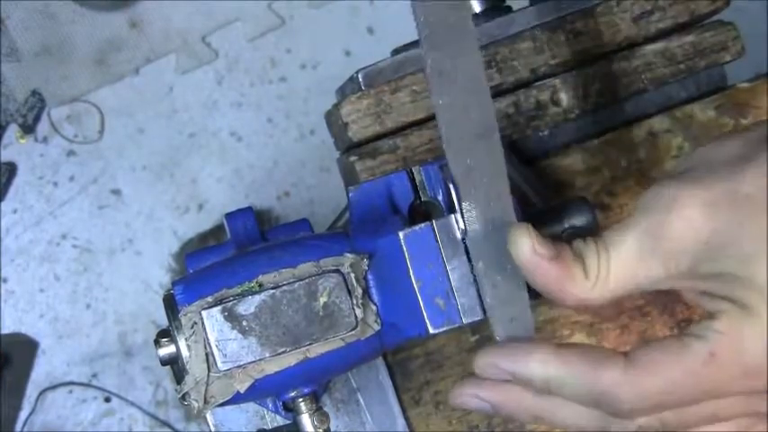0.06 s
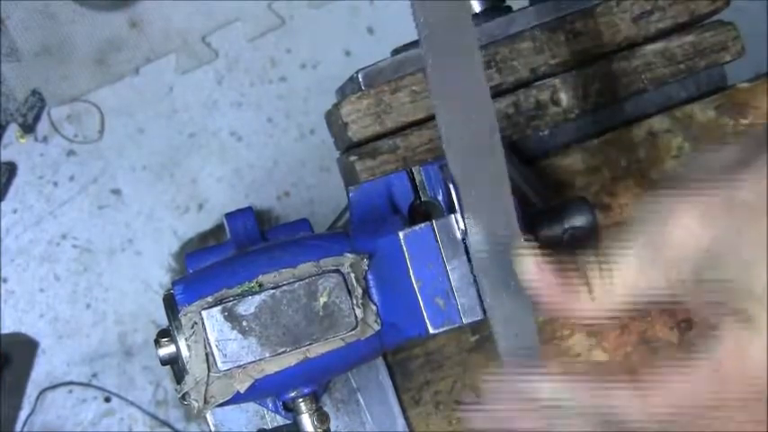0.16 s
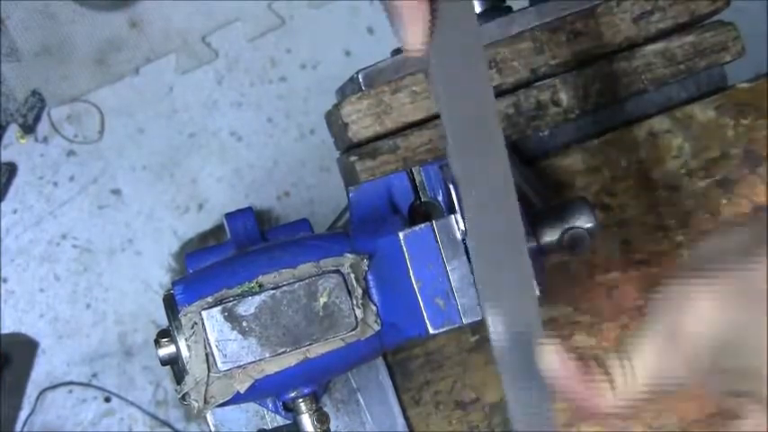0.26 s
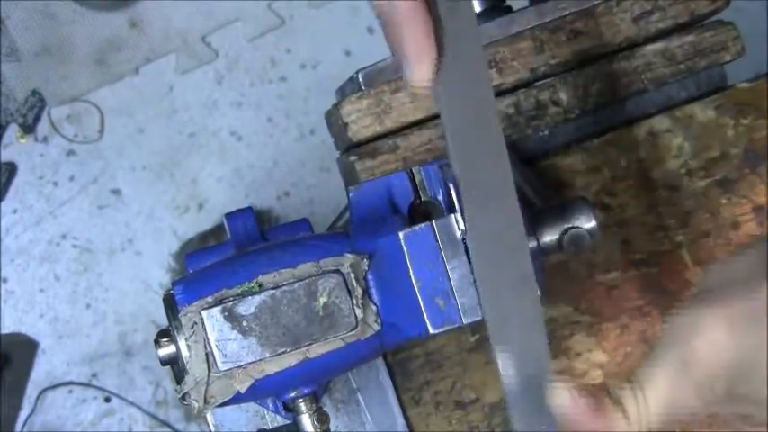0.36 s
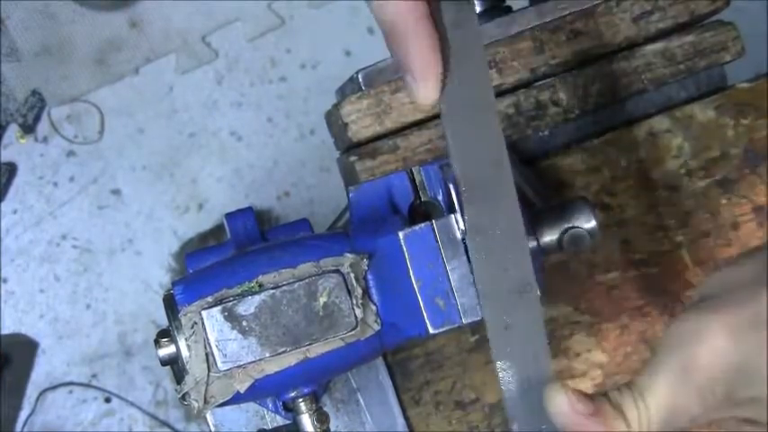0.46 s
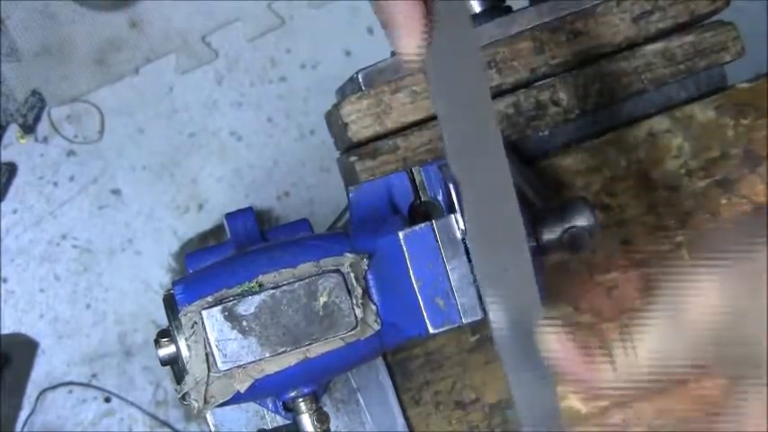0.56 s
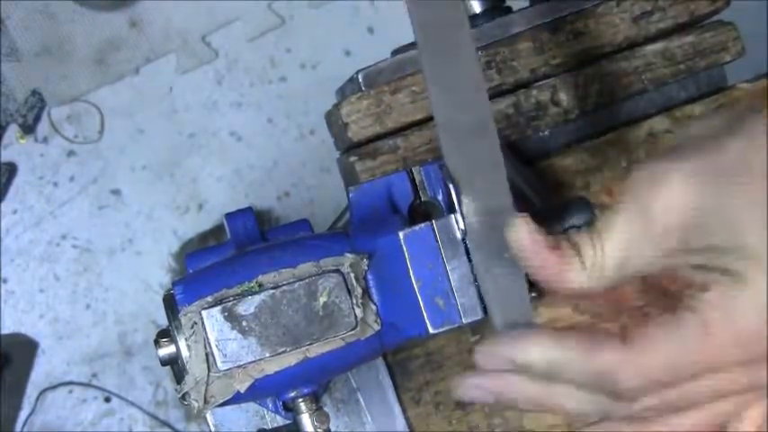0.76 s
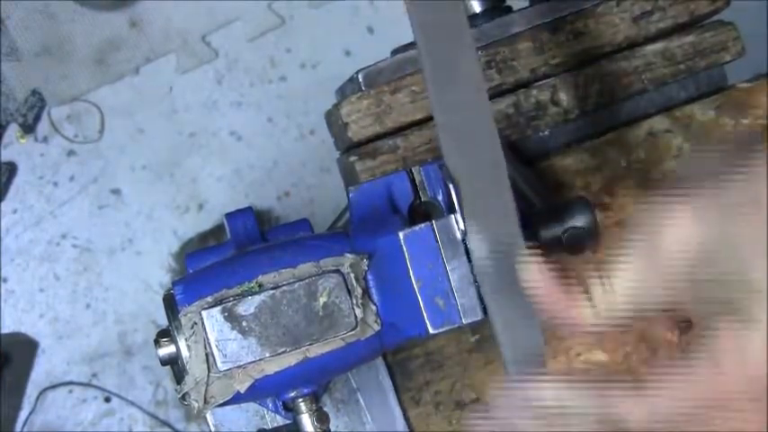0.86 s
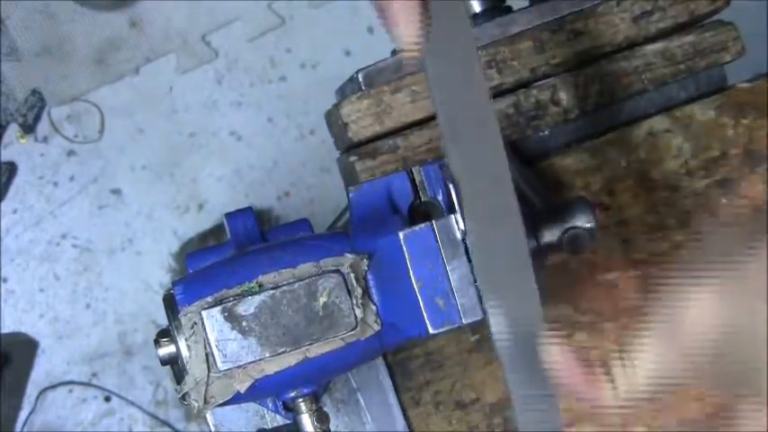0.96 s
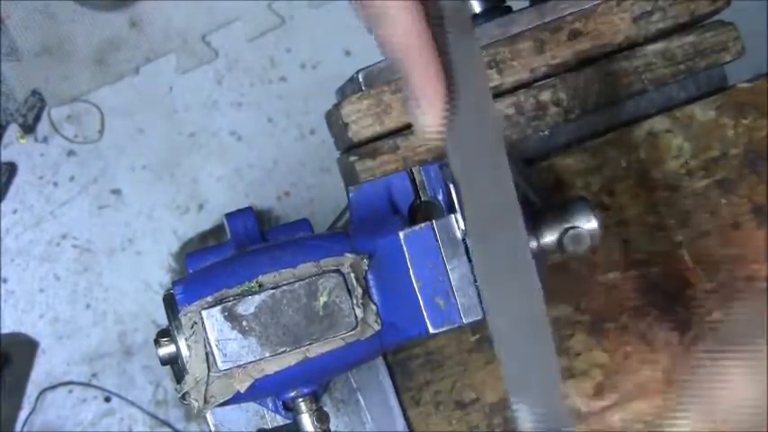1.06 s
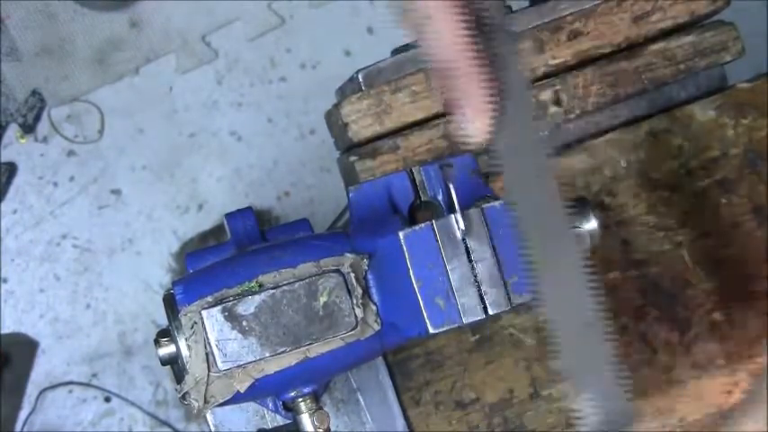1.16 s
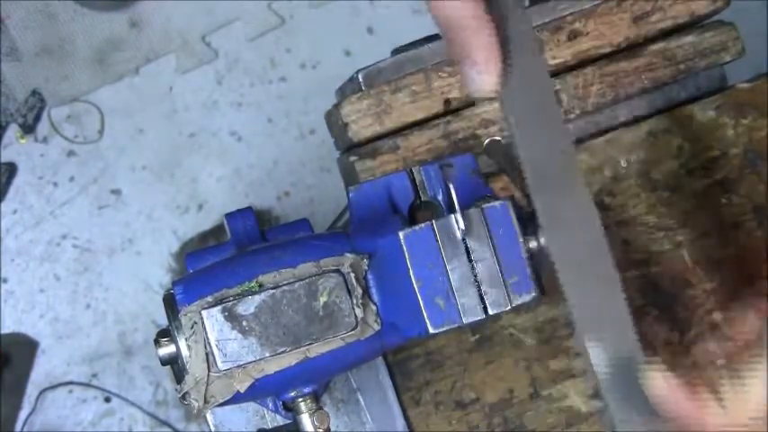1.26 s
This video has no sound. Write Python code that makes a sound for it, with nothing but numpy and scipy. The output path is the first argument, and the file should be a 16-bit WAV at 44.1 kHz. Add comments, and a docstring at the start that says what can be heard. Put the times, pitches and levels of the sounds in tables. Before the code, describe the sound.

A metal file scrapes thin steel sheet clamped in a vice. Two faint dull scuffs come before 0.15 s, then a gritty, ringing push from about 0.2 to 0.45 s. A louder, brighter draw back follows at 0.55-0.77 s, then a longer push at 0.86-1.17 s. Low vice and bench judder underlies the strokes. Close, dry small workshop, faint steady air and hum.

```python
"""In a small workshop with a low hum, a flat file works on thin steel sheet held in a bench vice.
After two light touches it is pushed across the edge, drawn back and pushed again.
Its teeth catch unevenly: trains of clicks mixed with gritty noise ring the sheet and the file.
Vice and bench judder as well, most on the push: low noise through a few resonances.
Room reflections, and in the top treble the stereo microphone, spread the filing left and right."""
import sys
import numpy as np
from scipy import signal
from scipy.fft import rfft, irfft
from scipy.io import wavfile
from scipy.ndimage import uniform_filter1d

SR = 44100
rng = np.random.default_rng(int(sys.argv[2]) if len(sys.argv) > 2 else 0)


def to_wav(sig):
    """Store sig (one row per channel, or 1-D mono) as 16-bit WAV at the path in sys.argv[1].

    Samples outside -1..1 are clipped; the rate is SR.
    """
    pcm = np.clip(np.atleast_2d(sig), -1, 1) * 32767
    pcm = np.round(pcm).astype(np.int16)
    wavfile.write(sys.argv[1], SR, pcm.T)  # frames by channels


N = 57330  # length in samples, 1.3 s


def undb(db):
    """Turn decibels into a plain gain."""
    return 10 ** (np.asarray(db) / 20)


def unit(x):
    """Scale to an average strength (rms) of 1."""
    return x / np.sqrt(np.mean(x ** 2))


def band(x, hz, width):
    """One resonance: lets through a narrow band, with gain 1 at its centre."""
    return signal.lfilter(*signal.iirpeak(hz, hz / width, fs=SR), x)


def cut(x, hz, kind, order=4):
    """Keep only what lies below ("low") or above ("high") a pitch."""
    return signal.sosfilt(signal.butter(order, hz, kind, fs=SR, output="sos"), x)


def colour(x, points):
    """Shape the tone through (Hz, dB) points with a filter that never sounds ahead of its input."""
    hz, db = np.array(points).T
    size = 2048
    grid = np.maximum(np.arange(size // 2 + 1) * SR / size, 1)
    log_gain = np.log(undb(np.interp(np.log(grid), np.log(hz), db)))
    # Folding the cepstrum forward in time gives the minimum-phase filter
    cepstrum = irfft(log_gain)
    cepstrum[1:size // 2] *= 2
    cepstrum[size // 2 + 1:] = 0
    response = irfft(np.exp(rfft(cepstrum)))
    return signal.fftconvolve(x, response)[:N]


def flutter(hz):
    """Smooth random wandering with a spread of 1, no faster than about the given pitch."""
    return unit(cut(rng.standard_normal(N), hz, "low", order=2))


# Tone of the workshop background.
# Each row: pitch in Hz, relative strength per Hz in dB.
BACKGROUND_COLOUR = [(18, -29), (30, -16), (153, -4), (296, -6), (505, -4), (1550, -12), (1670, -9.5),
                     (2050, -15.5), (2780, -20.5), (3000, -22), (7490, -29), (13100, -42)]
# How strongly left and right differ in the background.
# Each row: pitch in Hz, strength of the difference in dB.
BACKGROUND_SIDE = [(60, -15), (200, -8.5), (700, -15), (2100, -13), (7000, -8), (12700, 0)]
AIR_DB, HUM_HZ, HUM_DB = -45, 120, -55  # the air level is for the part shared by both sides


def background():
    """Steady workshop air, as coloured noise partly different left and right, and a pure low hum."""
    middle, side = (unit(colour(rng.standard_normal(N), BACKGROUND_COLOUR)) for _ in range(2))
    hum = undb(HUM_DB) * unit(np.sin(2 * np.pi * HUM_HZ * np.arange(N) / SR))
    left_right = colour(side, BACKGROUND_SIDE) * np.array([[1], [-1]])
    return undb(AIR_DB) * (middle + left_right) + hum


# Broad colour of scraping on the push, also used for the touches.
# Each row: pitch in Hz, relative strength per Hz in dB.
PUSH_COLOUR = [(180, -44.5), (300, -5), (425, -10), (538, 1.5), (583, -3), (693, -0.5), (838, -5.5),
               (936, -6.5), (1390, -12.5), (2200, -8), (5330, -21), (8290, -19), (9860, -25.5),
               (13100, -57)]
# Light touches of the file.
# Each row: start in seconds, level in dB before rise and fade, fade time (to 1/e) in seconds,
# centre pitch in Hz, width in Hz.
TOUCHES = [(0.027, -31.5, 0.02, 830, 1110), (0.117, -37.5, 0.0051, 2830, 2000)]
TOUCH_ATTACK_S, TOUCH_TOP_HZ = 0.0046, 3030


def touches():
    """Brief dull scuffs as the file settles on the edge: filtered noise that rises fast and fades."""
    t = np.arange(N) / SR
    out = 0
    for start, db, decay, hz, width in TOUCHES:
        scrape = colour(rng.standard_normal(N), PUSH_COLOUR)
        scuff = unit(cut(band(scrape, hz, width), TOUCH_TOP_HZ, "low"))
        age = np.maximum(t - start, 0)
        out = out + undb(db) * scuff * np.minimum(age / TOUCH_ATTACK_S, 1) * np.exp(-age / decay)
    return out


TOOTH_JITTER, TOOTH_SCATTER_DB = 0.16, 1.5  # unevenness in spacing (share of the rate) and in size
GRIT_DB, GRIT_SCATTER_DB = 2.5, 2.5  # grit compared with the clicks, and its own unevenness
CHATTER_HZ, CHATTER_DB = 255, 1.4  # the grip of the teeth flutters


def teeth(rate):
    """A click for each tooth that catches, uneven in spacing and size, with fine grit between."""
    phase = np.cumsum(rate * np.exp(TOOTH_JITTER * flutter(500))) / SR
    at = np.flatnonzero(np.diff(np.floor(phase)))  # one click per whole turn of the phase
    sizes = undb(TOOTH_SCATTER_DB * rng.standard_normal(N))
    clicks = np.zeros(N)
    clicks[at] = sizes[at] / np.sqrt(rate[at])
    grit = rng.standard_normal(N) * undb(GRIT_SCATTER_DB * rng.standard_normal(N))
    contact = unit(cut(clicks, 190, "high")) + undb(GRIT_DB) * unit(grit)
    return contact * undb(CHATTER_DB * flutter(CHATTER_HZ))


SPREAD_S, SPREAD_HZ = 0.003, 2028  # travel time of a bending wave at this pitch


def disperse(x):
    """Bending waves in steel carry the treble faster than the bass, which smears each click."""
    hz = np.arange(N // 2 + 1) * SR / N
    return irfft(rfft(x) * np.exp(-4j * np.pi * SPREAD_S * np.sqrt(SPREAD_HZ * hz)), N)


# Ring of the clamped sheet, before the broad colour is added.
# Each row: pitch in Hz, width in Hz, gain on the push in dB, gain on the draw in dB.
SHEET_MODES = [(540, 18, -4.5, -5), (683, 28, 0.5, -5.5), (724.6, 16, -0.5, 3), (841, 17, -6, -1),
               (960, 89, 0, -7), (1038, 25, -2, 2), (1277, 33, -3, 12), (1453, 15.5, 3, 7.5),
               (2590, 47, 5, 3), (6056, 45, -3, 8), (6670, 34, 6.5, -12), (9700, 230, 0, -17)]


def sheet_ring(bites, pushing):
    """The bites of the teeth set off the sheet's own resonances."""
    return sum(undb(push if pushing else draw) * band(bites, hz, width)
               for hz, width, push, draw in SHEET_MODES)


# Ring of the file, before the broad colour is added.
# Each row: pitch in Hz, width in Hz, gain on the push in dB, gain on the draw in dB,
# place along the blade where it rings most (0 to 1), reach around it as a share of the blade.
FILE_MODES = [(780, 32, -3, 6, 0.37, 0.2), (955, 65, 4, -24, 0.29, 0.12), (1818, 29, 4.5, 16.5, 0.53, 0.23),
              (2115, 25, -10, 8.5, 0.5, 0.15), (2198, 116, 8.5, 10, 0.22, 0.13),
              (2250, 220, 9.5, 0, 0.92, 0.1), (2749, 33, 11, 9, 0.52, 0.19),
              (2834, 130, 4.5, 10.5, 0.62, 0.15), (3070, 42, 14.5, 14.5, 0.69, 0.072),
              (3260, 65, 6, -3, 0.67, 0.09), (3414, 36, 7, 15, 0.16, 0.14), (3940, 45, 6, 7.5, 0.38, 0.14),
              (4250, 49, 13, -1, 0.53, 0.13), (4430, 134, 11, 8, 0.39, 0.15),
              (4820, 27, -6, 12, 0.12, 0.22), (8080, 290, 3.5, 9, 0.64, 0.12)]


def file_ring(bites, pushing, place):
    """Each resonance of the file is strongest when the contact is at its place along the blade."""
    ring = 0
    for hz, width, push, draw, best, reach in FILE_MODES:
        nearness = np.exp(-((place - best) / reach) ** 2)
        ring = ring + undb(push if pushing else draw) * band(bites * nearness, hz, width)
    return ring


HAND_S = 0.019  # the hand cannot change its pressure faster
SPLIT_HZ = 1250  # between low ring and rasp


def stroke(curve, tone, pushing, from_place, to_place, tooth_hz, slow_share, ring_db, rasp_db):
    """One pass: the file speeds up and slows down, the contact travels, sheet and file ring.

    tooth_hz is the mid-stroke rate of teeth, slow_share the part of it left at both ends."""
    t = np.arange(N) / SR
    times, *levels = np.array(curve).T
    ring, rasp = (uniform_filter1d(undb(np.interp(t, times, db, left=-120, right=-120)),
                                   int(HAND_S * SR) + 1) for db in levels)
    turn = np.pi * np.clip((t - times[0]) / (times[-1] - times[0]), 0, 1)
    place = from_place + (to_place - from_place) * (1 - np.cos(turn)) / 2
    speed = slow_share + (1 - slow_share) * np.sin(turn)
    bites = disperse(teeth(tooth_hz * speed))
    steel = colour(bites + sheet_ring(bites, pushing) + file_ring(bites, pushing, place), tone)
    # Bring both halves to the same strength over the stroke, so that the curves set their levels
    moving = (t > times[0]) & (t < times[-1])
    low, high = (part / np.std(part[moving])
                 for part in (cut(steel, SPLIT_HZ, "low"), cut(steel, SPLIT_HZ, "high")))
    return undb(ring_db) * ring * low + undb(rasp_db) * rasp * high


# First push, before smoothing and the trims ring_db and rasp_db.
# Each row: time in seconds, level of the low ring in dB, level of the rasp in dB.
FIRST_PUSH = [(0.16, -56, -66), (0.182, -42, -59), (0.21, -39, -31.5), (0.243, -32.5, -27.5),
              (0.265, -27.5, -32.5), (0.326, -35.5, -38.5), (0.396, -29.5, -31.5), (0.442, -38.5, -43.5),
              (0.466, -45, -63), (0.5, -70, -71)]


def first_push():
    """The file cuts forward, and the contact moves along most of the blade."""
    return stroke(FIRST_PUSH, PUSH_COLOUR, True, from_place=0.13, to_place=0.83,
                  tooth_hz=954.5, slow_share=0.55, ring_db=-1.5, rasp_db=-0.5)


# Resonances of vice and bench; each is filtered twice.
# Each row: pitch in Hz, half the width of each filter in Hz, relative gain in dB.
BENCH_MODES = [(100.6, 5.9, 0), (141.2, 35, -1), (240, 18.4, 1)]
# Judder of vice and bench.
# Each row: time in seconds, level in dB.
JUDDER = [(0.17, -70), (0.21, -46), (0.27, -41.5), (0.335, -34), (0.38, -39), (0.451, -37), (0.48, -52),
          (0.55, -51), (0.61, -45), (0.73, -44.5), (0.8, -59), (0.852, -54), (0.872, -36.5), (0.915, -42),
          (0.965, -36.5), (1.02, -39.5), (1.13, -41), (1.19, -57)]


def bench():
    """The uneven drag of the file shakes vice and bench, most on the cutting push."""
    shake = rng.standard_normal(N)
    body = sum(undb(db) * band(band(shake, hz, 2 * width), hz, 2 * width)
               for hz, width, db in BENCH_MODES)
    return unit(body) * undb(np.interp(np.arange(N) / SR, *np.array(JUDDER).T))


# Drawing back, before smoothing and the trims ring_db and rasp_db.
# Each row: time in seconds, level of the low ring in dB, level of the rasp in dB.
DRAW_BACK = [(0.5, -68, -73), (0.533, -47, -49), (0.552, -45, -46.5), (0.572, -31.5, -31),
             (0.6, -27.5, -24.5), (0.634, -25.5, -21), (0.664, -29, -26), (0.71, -23.5, -22.5),
             (0.752, -29.5, -40), (0.778, -45, -52), (0.81, -52, -68)]
# Broad colour of scraping on the draw.
# Each row: pitch in Hz, relative strength per Hz in dB.
DRAW_COLOUR = [(180, -52), (300, -19), (583, -9.5), (704, -5), (1170, -16.5), (1260, -18.5), (2160, -9.5),
               (2450, -11.5), (2790, -8.5), (3160, -16), (3940, -14.5), (5240, -22.5), (9560, -20),
               (13100, -60.5)]


def draw_back():
    """The file slides back, with teeth passing more slowly and the contact returning."""
    return stroke(DRAW_BACK, DRAW_COLOUR, False, from_place=0.73, to_place=0.0091,
                  tooth_hz=781.7, slow_share=0.6, ring_db=-0.5, rasp_db=-1)


# Second push, before smoothing.
# Each row: time in seconds, level of the low ring in dB, level of the rasp in dB.
SECOND_PUSH = [(0.83, -54, -65), (0.858, -50, -57), (0.868, -35, -40.5), (0.886, -34, -37),
               (0.916, -30, -29.5), (0.975, -33, -38), (1.016, -29, -28.5), (1.045, -29, -27),
               (1.08, -30, -29), (1.11, -33, -29), (1.13, -32.5, -43), (1.152, -40.5, -39), (1.2, -60, -74)]


def second_push():
    """A slightly longer cut forward, using more of the blade."""
    return stroke(SECOND_PUSH, PUSH_COLOUR, True, from_place=0.1, to_place=1.052,
                  tooth_hz=948, slow_share=0.55, ring_db=0, rasp_db=0)


# Strength of the spread-out part of the filing sound, differing left and right:
# room reflections, and above about 11 kHz the stereo microphone's widening.
# Each row: pitch in Hz, strength in dB.
WIDE_COLOUR = [(90, -14.5), (250, -8), (650, -19), (1150, -13), (2200, -13.5), (4000, -16.5), (9000, -14),
               (12500, 9)]
WIDE_T60_S, WIDE_DELAY_S = 0.086, 0.0051  # time constant for a fade of 60 dB, wait before it starts


def room_and_microphone(x):
    """Room reflections and the microphone's top-treble widening: fading noise, different each side."""
    t = np.arange(SR // 2) / SR
    tails = rng.standard_normal((2, len(t))) * undb(-60 * t / WIDE_T60_S) * (t > WIDE_DELAY_S)
    coloured = colour(x, WIDE_COLOUR)
    return np.array([signal.fftconvolve(coloured, tail / np.linalg.norm(tail))[:N] for tail in tails])


def scene():
    """Touches, push, draw and a longer push, heard directly and spread out left and right."""
    filing = touches() + first_push() + bench() + draw_back() + second_push()
    return background() + filing + room_and_microphone(filing)


TOP_HZ = 13200


def record(dry):
    """The recorder cuts the deepest bass and the top."""
    without_bass = cut(dry, 50, "high", order=2)
    return signal.sosfilt(signal.ellip(8, .2, 70, TOP_HZ, fs=SR, output="sos"), without_bass)


dry = scene()
out = record(dry)
to_wav(out)
```